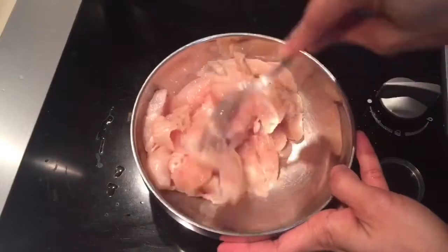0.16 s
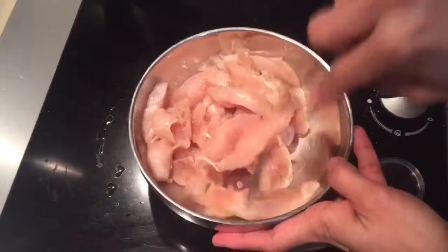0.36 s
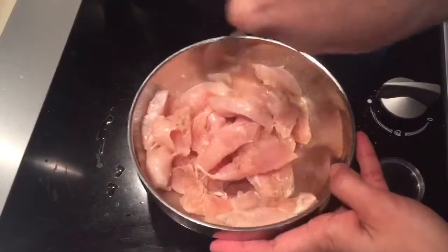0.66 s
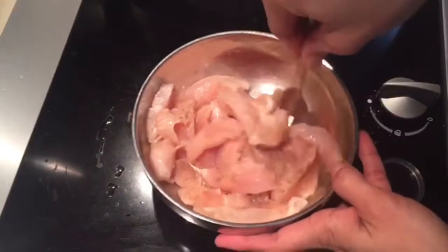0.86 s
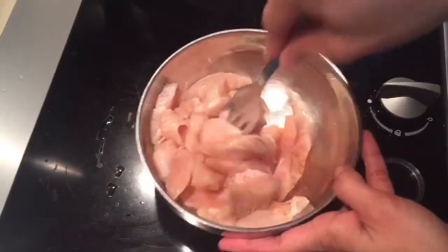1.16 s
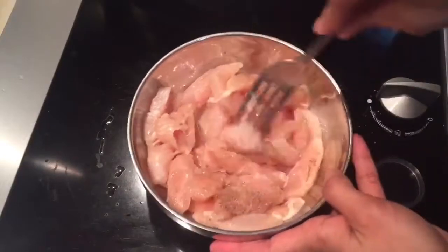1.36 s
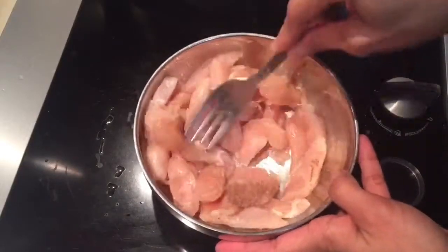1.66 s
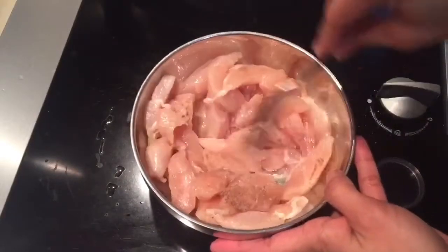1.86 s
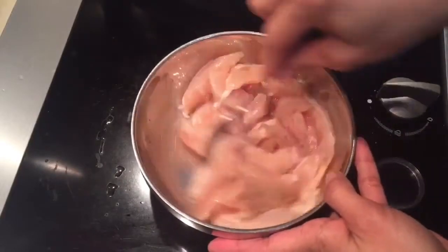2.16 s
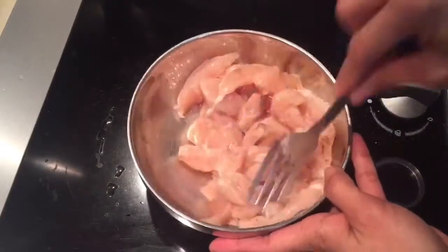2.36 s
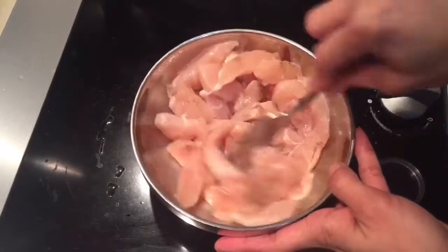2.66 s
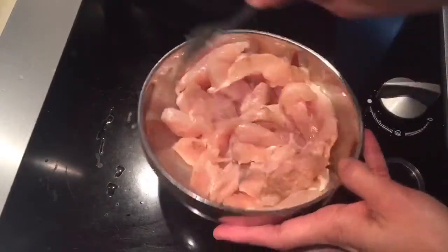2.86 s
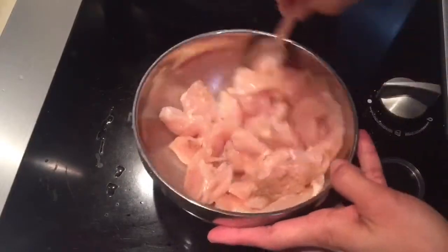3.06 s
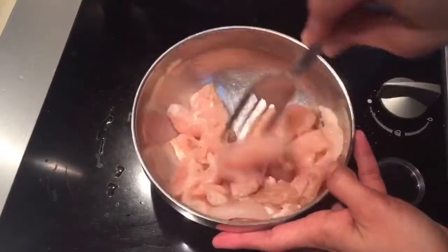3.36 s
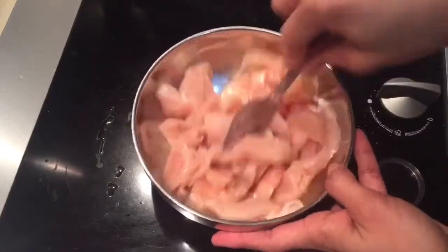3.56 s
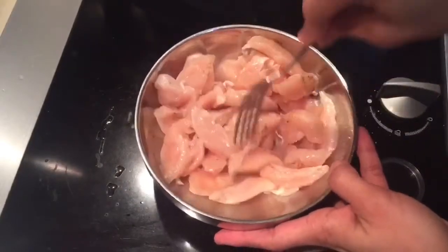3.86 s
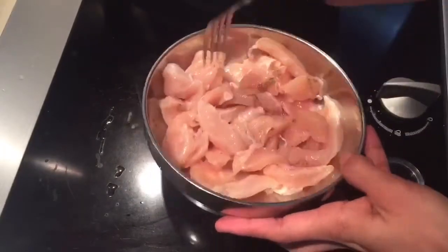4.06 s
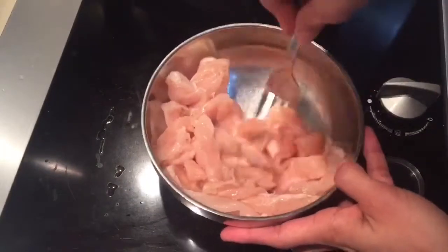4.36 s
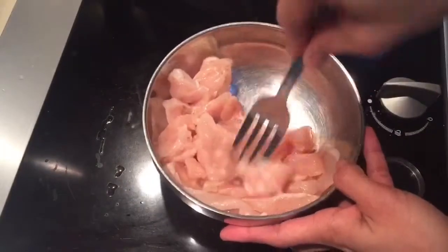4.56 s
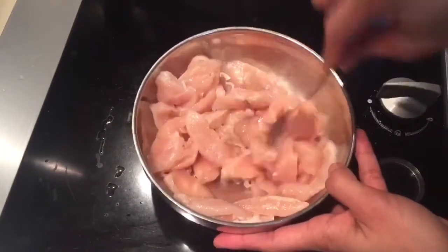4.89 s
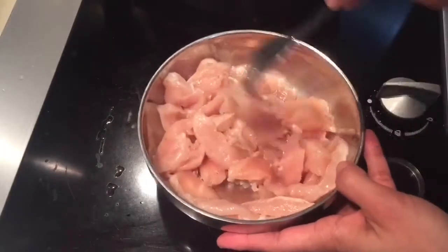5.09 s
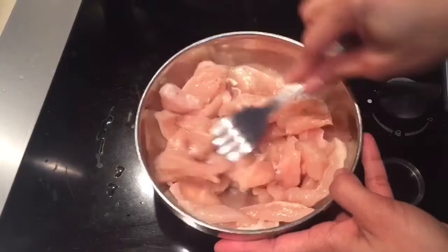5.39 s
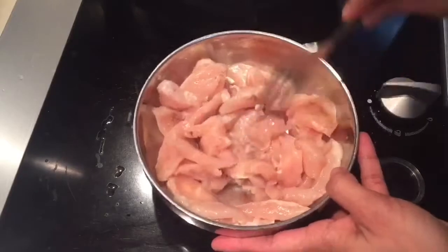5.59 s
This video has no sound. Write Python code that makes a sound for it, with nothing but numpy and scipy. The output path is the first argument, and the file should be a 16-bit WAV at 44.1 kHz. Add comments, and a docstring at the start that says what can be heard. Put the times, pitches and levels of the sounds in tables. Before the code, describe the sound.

Close-miked stirring of moist meat in a metal bowl: two early thuds, a clink before one second, soft sticky crackle, and short scrapes and squeaks of tines on steel. More clinks come around two, three and four seconds, then a late knock and faint rubbing. A low motor hum with soft air noise stays underneath; the kitchen echo is brief.

```python
"""In a kitchen, a fork turns strips of raw chicken in a steel bowl on a glass hob. The appliance hum is
wavering sines over shaped noise; the wet meat is clumped crackle, bubbles and pops. The tines scrape as random
slips ringing fork and bowl; short squeaks and rings are narrow bands of noise. The bowl knocks dully on the hob
and the fork clinks on the bare wall: noise bursts with ringing modes. A short diffuse echo follows every sound
in the bowl."""
import sys
import numpy as np
from scipy import signal
from scipy.fft import rfft, irfft
from scipy.io import wavfile
from scipy.ndimage import uniform_filter1d

SR = 44100
rng = np.random.default_rng(int(sys.argv[2]) if len(sys.argv) > 2 else 0)


def generate_wav(sig):
    """Save sig (samples, or channels by samples) to the path in sys.argv[1] as 16-bit PCM at SR."""
    pcm = np.round(np.clip(np.atleast_2d(sig).T, -1, 1) * 32767).astype(np.int16)
    wavfile.write(sys.argv[1], SR, pcm)


N = 252693  # length in samples


def amp(db):
    """Decibels to gain."""
    return 10 ** (np.asarray(db) / 20)


def unit(x):
    """Scales to rms 1."""
    return x / np.sqrt(np.mean(x ** 2) + 1e-20)


def steady(x):
    """Evens the level out to rms 1 over a running tenth of a second."""
    return x / np.sqrt(abs(uniform_filter1d(x ** 2, size=SR // 10)) + 1e-12)


def attack(x):
    """Scales a blow to rms 1 over its first 12 ms."""
    return x / np.sqrt(np.mean(x[:530] ** 2) + 1e-20)


def read(points, hz):
    """Reads a table on a log-frequency axis."""
    f, value = np.transpose(points)
    return np.interp(np.log(hz + 1), np.log(f + 1), value)


def add(mix, s, sound):
    """Mixes a sound in at time s."""
    part = mix[max(round(s * SR), 0):][:len(sound)]
    part += sound[:len(part)]


def colour(x, spectrum):
    """Filters by a spectrum in dB."""
    hz = np.fft.rfftfreq(len(x), 1 / SR)
    return irfft(rfft(x) * amp(read(spectrum, hz)), len(x))


def noise(spectrum, size):
    """Noise of rms 1 with the given spectrum."""
    return unit(colour(rng.standard_normal(size), spectrum))


def wander(rate):
    """A random curve of rms 1 that varies at up to about rate Hz."""
    hz = np.fft.rfftfreq(N, 1 / SR)
    return unit(irfft(rfft(rng.standard_normal(N)) * np.exp(-(hz / rate) ** 2), N))


def grains(per_s, spread_db):
    """Random tiny clicks, a few of them large."""
    size = amp(spread_db * np.minimum(rng.exponential(1, N), 4))
    happens = rng.random(N) < per_s / SR
    return unit(size * rng.choice([-1, 1], N) * happens)


def push(start, length, db, change_db, attack_s, release_s):
    """Gain of one push of the fork: it sets in, holds while the pressure grows or eases, and dies away."""
    t = np.arange(N) / SR - start
    held = amp(db + change_db * np.clip(t / length, 0, 1))
    return np.clip(t / attack_s, 0, 1) * held * np.exp(-np.maximum(t - length, 0) / release_s)


def ring(modes, damping, detune=0.00091, spot_db=3.0):
    """Impulse response of a set of modes; the shifting meat and the spot touched alter each a little."""
    t = np.arange(SR // 2) / SR
    response = np.zeros(len(t))
    variations = rng.uniform(-1.7, 1.7, (len(modes), 2))
    for (hz, width, db), (spot, load) in zip(modes, variations):
        level = amp(db + spot_db * spot) * np.sqrt(width)
        decay = np.exp(-np.pi * width * damping * t)
        cycles = hz * (1 + detune * load) * t + rng.random()
        response += level * decay * np.sin(2 * np.pi * cycles)
    return response


def favoured(modes, pitches, boost_db):
    """A blow near the antinode of a mode drives it harder; modes within 2.5 % of a pitch are boosted."""
    def near(hz):
        return any(abs(hz / pitch - 1) < .025 for pitch in pitches)
    return [(hz, width, db + boost_db * near(hz)) for hz, width, db in modes]


# centres of the low, middle, bright and top band of a blow: f/Hz
BLOW_BANDS = [450, 1700, 6500, 13500]


def voiced(x, band_dbs):
    """The spot and hardness of a blow set its strength in four broad, overlapping bands."""
    hz, spectrum = np.fft.rfftfreq(2 * len(x), 1 / SR), rfft(x, 2 * len(x))
    out = np.zeros(len(x))
    for db, share in zip(band_dbs, np.eye(len(BLOW_BANDS))):
        weight = read(list(zip(BLOW_BANDS, share)), hz)
        out += amp(db) * attack(irfft(spectrum * weight)[:len(x)])
    return out


# motor hum partials: f/Hz, level/dB before the waver
HUM_PARTIALS = [(114.4, -34.5), (167.5, -55)]
# spectrum of the low rumble: f/Hz, relative level/dB
RUMBLE_SPECTRUM = [(10, -57), (25, -43), (35, -22.5), (50, -9.5), (63, -0.5), (73, -4), (87, 5.5),
                   (100, -2.5), (122, 4), (148, -8.5), (172, -7), (195, -8), (230, -21), (300, -30.5),
                   (500, -54.5)]
# spectrum of the moving air: f/Hz, relative level/dB
AIR_SPECTRUM = [(140, -18), (230, -9), (322, 2.5), (436, -8.5), (511, 0), (811, -1), (1000, -4.5),
                (1100, -2.5), (1590, -5), (2270, -8), (2810, -18), (3420, -12.5), (5050, -28.5),
                (5920, -26.5), (9000, -48.5), (16000, -57.5)]


def appliance(waver_db=-1.0, drift_rad=0.35, rumble_db=-35.5, air_db=-43.5):
    """A motor hum wavering in level and phase over low rumble and moving air."""
    t = np.arange(N) / SR
    out = amp(rumble_db) * noise(RUMBLE_SPECTRUM, N) + amp(air_db) * noise(AIR_SPECTRUM, N)
    for hz, db in HUM_PARTIALS:
        level = amp(db + waver_db * wander(8)) * np.sqrt(2)
        out += level * np.sin(2 * np.pi * hz * t + drift_rad * wander(8.5))
    return out


# decay of the room: f/Hz, time to fall 60 dB t/s
ROOM_DECAY = [(150, 0.29), (600, 0.16), (2500, 0.23), (8000, 0.2), (16000, 0.15)]


def kitchen(x, build_s=0.003):
    """Diffuse reflections that build up quickly and die band by band."""
    hz, t, z = signal.stft(rng.standard_normal(SR // 2), SR, nperseg=256)
    fall = amp(-60 * t / read(ROOM_DECAY, hz)[:, None])
    tail = signal.istft(z * fall, SR, nperseg=256)[1]
    tail = tail * (1 - np.exp(-(np.arange(len(tail)) / SR / build_s) ** 2))
    return signal.fftconvolve(x, tail / np.linalg.norm(tail))[:N]


# meat sliding over meat: start t/s, length t/s, relative level/dB, change along the turn level/dB
MEAT_TURNS = [(-0.03, 0.096, -45, 7), (0.109, 0.045, -52, 3), (0.275, 0.11, -52, 13.5),
              (1.21, 0.15, -35, -16), (1.506, 0.11, -42.5, -11), (1.718, 0.14, -44.5, -11),
              (2.399, 0.15, -44.5, -4.5), (2.642, 0.11, -47.5, 5), (3.475, 0.18, -49.5, 2),
              (4.651, 0.26, -38, -21), (5.42, 0.15, -55.5, -2)]
# filter of the wet crackle: f/Hz, relative level/dB
WET_SPECTRUM = [(600, -1), (1500, 0), (3500, 1.5), (5000, -2.5), (6100, 1.5), (7600, -4.5), (9300, -4),
                (10500, -4.5), (12500, 0), (16000, -8)]


def squelch(gain_db=-1, clump_db=2, fizz=0.8, bubble_db=-4, attack_s=0.05, release_s=0.02):
    """Wet surfaces peel apart in clumps of minute crackles and tiny bubbles."""
    crackle = grains(1200, 3.8) * amp(clump_db * wander(45)) + fizz * rng.standard_normal(N)
    t = np.arange(600) / SR
    bubbles = np.zeros(N)
    for hz in np.geomspace(2500, 14000, num=16):
        bubble = np.sin(2 * np.pi * hz * t) * np.exp(-t * hz / 9)
        bubbles += signal.oaconvolve(grains(18, 7.5), bubble)[:N]
    wet = unit(colour(crackle, WET_SPECTRUM)) + amp(bubble_db) * unit(bubbles)
    motion = sum(push(*turn, attack_s, release_s) for turn in MEAT_TURNS)
    return amp(gain_db) * motion * steady(wet)


def small_pops(count=16, pop_db=-44.5, snap_db=-40, centre_hz=2720, spread_db=-5):
    """Random weak pops, scattered over the turns of the meat."""
    rows = []
    for turn, when, size, pitch, snap in rng.random((count, 5)):
        start, length = MEAT_TURNS[int(turn * len(MEAT_TURNS))][:2]
        cavity_level = pop_db + spread_db * (2 * size - 1)
        snap_level = snap_db + spread_db * (2 * snap - 1)
        hz = centre_hz * 2 ** (pitch - .5)  # within half an octave either way
        rows.append((start + when * length, cavity_level, hz, snap_level))
    return rows


# larger wet films snapping: t/s, cavity relative level/dB, cavity f/Hz, snap relative level/dB
FILM_POPS = [(0.161, -32.5, 4240, -48), (0.276, -49, 3490, -50), (1.1373, -39, 2040, -48),
             (1.7707, -36, 2590, -57), (2.6967, -33, 2230, -49), (2.724, -30, 2970, -35),
             (3.26, -34.5, 2820, -55), (3.597, -40, 2390, -44), (3.678, -42, 2290, -43),
             (4.4466, -40, 2380, -34.5), (4.5795, -35.5, 2210, -66)]


def pops(cavity_db=-4, snap_db=3, life_s=0.0049, snap_s=0.0017, splash=1.0):
    """A film of juice bursts: a high snap and a few cycles of a small cavity."""
    out, t = np.zeros(N), np.arange(2048) / SR
    for s, cavity_level, hz, snap_level in FILM_POPS + small_pops():
        wall = splash * noise([(hz / 4, -20), (hz, 0), (hz * 2, -6), (hz * 4, -25)], len(t))
        cavity = (np.sin(2 * np.pi * hz * t) + wall) * np.exp(-t / life_s)
        snap = noise([(4000, -30), (9000, -6.5), (13000, -1), (16000, -4)], len(t)) * np.exp(-t / snap_s)
        add(out, s, amp(cavity_level + cavity_db) * cavity + amp(snap_level + snap_db) * snap)
    return out


# short narrow tones in the steel, squeaks of the tines and brief rings of the bowl:
# t/s, length t/s, centre f/Hz, glide f/Hz, width f/Hz, rms level/dB
STEEL_TONES = [(0.736, 0.05, 6450, -250, 400, -37.5), (0.795, 0.027, 11400, 0, 300, -32.5),
               (1.362, 0.0093, 2155, -900, 500, -38), (2.127, 0.066, 4500, -650, 330, -36.5),
               (2.141, 0.067, 1024, -2, 340, -40.5), (2.146, 0.052, 2555, 16, 50, -41),
               (3.106, 0.045, 4490, 217, 800, -39.5), (3.795, 0.04, 4210, 0, 200, -37),
               (4.161, 0.03, 2335, 6, 100, -30), (4.169, 0.034, 1638, 1, 100, -27.5),
               (4.188, 0.032, 13900, -1, 502, -30), (4.191, 0.028, 4820, 0.5, 100, -29.5),
               (4.33, 0.033, 3280, -3, 170, -44)]


def steel_tones():
    """Brief fluttering tones, squeaked or rung, some of which bend in pitch."""
    out, f = np.zeros(N), np.fft.fftfreq(SR // 2, 1 / SR)
    for s, length, hz, glide, width, db in STEEL_TONES:
        # narrow complex noise makes the tone flutter in level and phase
        white = rng.standard_normal(len(f)) + 1j * rng.standard_normal(len(f))
        narrow = np.fft.fft(white) / (1 + (2 * f / width) ** 2)
        flutter = np.fft.ifft(narrow)[:int(length * SR)]
        cycles = np.cumsum(hz + glide * np.linspace(-.5, .5, len(flutter))) / SR
        tone = (flutter * np.exp(2j * np.pi * cycles)).real
        add(out, s, amp(db) * unit(tone * signal.windows.tukey(len(tone), .7)))
    return out


# tines dragged over the steel: start t/s, length t/s, rub relative level/dB, rasp relative level/dB,
# change of pressure along the stroke level/dB
TINE_STROKES = [(0.593, 0.22, -58, -69.5, 9), (0.781, 0.1, -49.5, -31, -4.5), (0.922, 0.067, -40, -50.5, 2),
                (1.05, 0.04, -73, -55.5, 1.5), (2.119, 0.052, -45, -31.5, -3), (2.23, 0.11, -58, -55, -4),
                (2.841, 0.09, -50, -62.5, 11), (2.977, 0.18, -35.5, -31.5, -6.5),
                (3.16, 0.26, -39.5, -50, -17), (3.778, 0.053, -36.5, -33, -5.5), (4.009, 0.19, -46, -62, 2),
                (4.195, 0.03, -33, -31, -7.5), (4.299, 0.13, -42.5, -52, -6.5),
                (4.334, 0.026, -37.5, -61, -1), (5.051, 0.18, -47, -63, 1.5),
                (5.343, 0.27, -45.5, -60, -4.5), (5.42, 0.023, -48, -58.5, 5.5)]
# modes of the fork: f/Hz, width before damping f/Hz, relative level/dB
FORK_MODES = [(858, 57, -3.5), (2198, 31, 5.5), (2450, 70, -4), (3185, 60, -0.5), (3280, 36, -12.5),
              (4550, 90, -14.5), (5700, 80, -18.5), (5700, 51, -7.5), (6900, 70, -2), (8480, 55, -3.5),
              (8900, 50, -14), (10000, 83, -19), (11300, 110, -6), (13230, 100, -15.5)]
# modes of the bowl, which the clinks ring too: f/Hz, width before damping f/Hz, relative level/dB
BOWL_MODES = [(480, 140, -15.5), (1340, 22, -13), (1599, 50, 5.5), (2046, 120, 9.5), (2215, 21, 0),
              (2764, 320, 6), (3330, 57, -17.5), (3730, 44, -3), (4550, 91, -3), (4640, 24, -12),
              (5290, 15, -12.5), (6200, 27, -2), (6800, 21, -11.5), (6720, 21, -8.5), (7200, 69, -6.5),
              (7630, 46, -3), (7320, 23, -10.5), (9640, 84, -14.5), (8520, 60, -6), (10700, 37, -19.5),
              (9560, 60, -8), (9800, 61, -5.5), (10500, 59, -14.5), (11370, 48, -6.5), (13600, 77, -14.5),
              (15200, 110, -13), (14800, 160, -9), (15300, 80, -10.5)]
# filter of the dull rub: f/Hz, relative level/dB
RUB_SPECTRUM = [(500, -21.5), (850, 3.5), (1400, 5), (2200, -5), (2850, 2.5), (3300, 2), (4400, 3),
                (5100, -19), (6500, -45.5)]
# filter of the bright rasp: f/Hz, relative level/dB
RASP_SPECTRUM = [(3500, -22), (5200, -5), (6200, -3.5), (7500, -5.5), (9900, -3.5), (10600, -7.5),
                 (11400, -2.5), (12300, -2.5), (14000, -6.5), (16000, -3.5)]


def scrapes(rub_db=-1, rasp_db=-1, fork_db=2, bowl_db=-4, dry_db=-3, jerk_db=2, rasp_ring_db=-2,
            fork_damping=0.47, bowl_damping=2.1, attack_s=0.011, release_s=0.019):
    """Tiny jerky slips of the tines ring fork and bowl: a dull rub through juice, a bright rasp on bare steel."""
    slips = grains(3500, 0.6) * amp(jerk_db * wander(50))
    fork = unit(signal.oaconvolve(slips, ring(FORK_MODES, fork_damping))[:N])
    bowl = unit(signal.oaconvolve(slips, ring(BOWL_MODES, bowl_damping))[:N])
    dull = amp(dry_db) * unit(slips) + amp(fork_db) * fork + amp(bowl_db) * bowl
    bright = unit(slips) + amp(rasp_ring_db) * (fork + bowl)
    rub = amp(rub_db) * steady(colour(dull, RUB_SPECTRUM))
    rasp = amp(rasp_db) * steady(colour(bright, RASP_SPECTRUM))
    out = np.zeros(N)
    for s, length, rub_level, rasp_level, change_db in TINE_STROKES:
        pressure = push(s, length, 0, change_db, attack_s, release_s)
        out += pressure * (amp(rub_level) * rub + amp(rasp_level) * rasp)
    return out


# bowl knocking on the hob: t/s, low, middle, bright and top relative level/dB, # favoured mode f/Hz, tick f/Hz
BOWL_KNOCKS = [(0.0305, -13.5, -27.5, -30.5, -43, 425, 5860), (0.3652, -9, -13, -17.5, -44, 715, 6800),
               (1.282, -31, -34, -38, -59, 1230, 4100), (3.338, -23, -34.5, -37, -80, 425, 3960),
               (3.7713, -32, -36, -47, -41, 270, 9000), (3.7862, -19.5, -36, -21, -29, 715, 4250),
               (4.9663, -13, -19.5, -25, -28, 590, 8350)]
# modes of the padded bottom: f/Hz, width before damping f/Hz, relative level/dB
BOTTOM_MODES = [(280, 40, -5.5), (342, 41, -5), (434, 59, 3.5), (600, 33, -0.5), (709, 39, -1),
                (823, 89, -8), (1233, 30, -3), (1810, 14, -16), (2390, 100, -5.5), (3102, 84, -6),
                (4390, 99, -22)]
# spectrum of the knock: f/Hz, relative level/dB
KNOCK_SPECTRUM = [(71, -21), (120, 0.5), (256, -16.5), (418, -10.5), (1070, -12.5), (1240, -24.5),
                  (1580, -18.5), (2990, -21.5), (3520, -23), (4060, -20.5), (4880, -26), (7050, -29.5),
                  (16000, -27)]


def knocks(tick_s=0.0039, tick=0.93, tine_db=-15, thud_s=0.01, swell_s=0.003, modes_db=-1, damping=1.0,
           favour_db=5, hob_db=-17, hob_s=0.022, gain_db=-4):
    """The bowl knocks on the hob, its bottom damped by the meat: a tick of the tines, a short thud of the bowl,
    then the hob's dull shudder."""
    out, t = np.zeros(N), np.arange(SR // 2) / SR
    lowpass = signal.butter(2, 3500, fs=SR, output="sos")
    for s, *band_dbs, mode_hz, tick_hz in BOWL_KNOCKS:
        peak = [(.7, -40), (.9, -3), (1, 0), (1.1, -3), (1.3, -40)]
        tine = noise([(tick_hz * ratio, db) for ratio, db in peak], len(t))
        contact = (tick * noise(KNOCK_SPECTRUM, len(t)) + amp(tine_db) * tine) * np.exp(-t / tick_s)
        body = signal.sosfilt(lowpass, noise(KNOCK_SPECTRUM, len(t)))
        body = body * (np.exp(-t / thud_s) + amp(hob_db) * np.exp(-t / hob_s))
        modes = attack(ring(favoured(BOTTOM_MODES, [mode_hz], favour_db), damping))
        thud = (body + amp(modes_db) * modes) * (1 - np.exp(-t / swell_s))
        add(out, s, voiced(contact + thud, band_dbs))
    return amp(gain_db) * out


# fork on the bare wall: t/s, low, middle, bright and top relative level/dB,
# favoured low mode f/Hz, favoured high mode f/Hz, ring relative level/dB, chatter t/s
FORK_CLINKS = [(0.7133, -23, -19, -15.5, -21, 1630, 3770, -8.5, 0.022),
               (2.061, -29.5, -21, -18.5, -18.5, 1950, 8580, 4.5, 0.014),
               (2.947, -37, -21.5, -18.5, -21.5, 2210, 7510, -0.5, 0.017),
               (4.157, -30.5, -21, -13.5, -16, 2210, 7740, 3, 0.024)]
# spectrum of the clink: f/Hz, relative level/dB
CLINK_SPECTRUM = [(150, -51), (250, -26), (444, 1), (607, -22), (1080, -11.5), (1220, -2.5), (2200, -0.5),
                  (2530, -25.5), (2760, -11), (3280, -6), (3770, -5), (5730, -12.5), (7700, -9),
                  (14700, -17.5), (16000, -26.5)]


def clinks(modes_db=3, shimmer_db=-8, shimmer_hz=2.2 / 0.23, shimmer_damping=0.76, damping=0.7, favour_db=8,
           pressed_db=3, pressed_damping=0.75, swell_s=0.002, skid_db=-13, skid_s=0.059, gain_db=-0.5):
    """Steel on steel: a crack, the bowl's main modes, a shimmer of dense weak ones, and the tines skidding on."""
    out, t = np.zeros(N), np.arange(SR // 2) / SR
    for s, *band_dbs, low_hz, high_hz, ring_db, chatter_s in FORK_CLINKS:
        modes = favoured(BOWL_MODES, (low_hz, high_hz), favour_db)
        # shimmer_hz is the width of each weak mode before damping
        weak = [(hz, shimmer_hz, read(CLINK_SPECTRUM, hz)) for hz in rng.uniform(700, 16000, size=150)]
        burst = noise(CLINK_SPECTRUM, len(t)) * np.exp(-(t / chatter_s) ** 2)
        # the fork pressing on the wall drives the modes hard at first
        pressed = attack(ring(modes, pressed_damping) * (1 - np.exp(-t / swell_s)))
        crack = burst + amp(pressed_db) * pressed
        shimmer = attack(ring(weak, shimmer_damping))
        main = attack(ring(modes, damping))
        skid = unit(colour(grains(900, 2.05)[:len(t)], CLINK_SPECTRUM)) * np.exp(-(t / skid_s) ** 2)
        tail = amp(shimmer_db) * shimmer + amp(modes_db) * main + amp(skid_db) * skid
        add(out, s, voiced(crack + amp(ring_db) * tail, band_dbs))
    return amp(gain_db) * out


def scene(room_db=-11):
    """The hum, everything in the bowl, and the bowl's echo in the kitchen."""
    hum = appliance()
    bowl = squelch() + pops() + steel_tones() + scrapes() + knocks() + clinks()
    return (bowl + amp(room_db) * kitchen(bowl) + hum)[None]


def record(dry, edge_hz=15850):
    """Peaks beyond full scale clip; then a steep low-pass limits the band."""
    lowpass = signal.firwin(601, edge_hz, window=("kaiser", 8), fs=SR)
    return signal.oaconvolve(np.clip(dry, -1, 1), lowpass[None], "same")


dry = scene()
out = record(dry)
generate_wav(out)
```